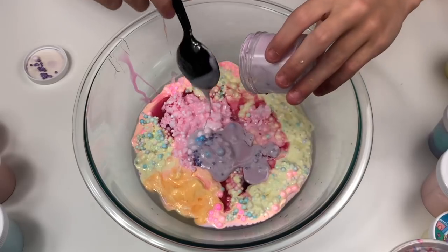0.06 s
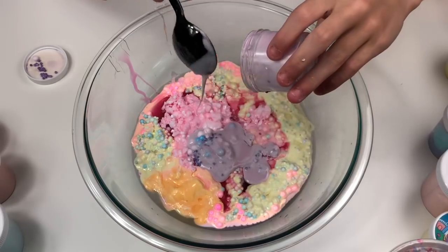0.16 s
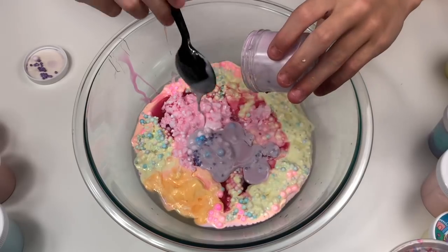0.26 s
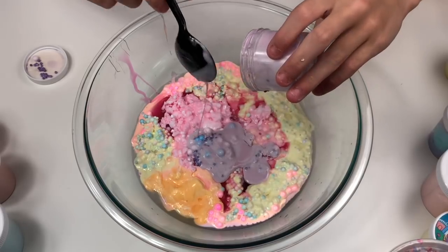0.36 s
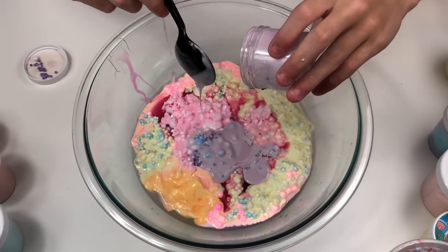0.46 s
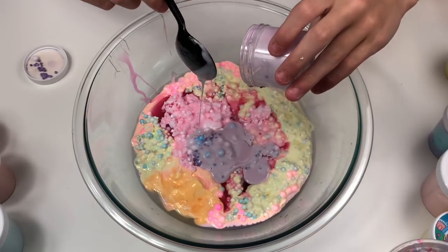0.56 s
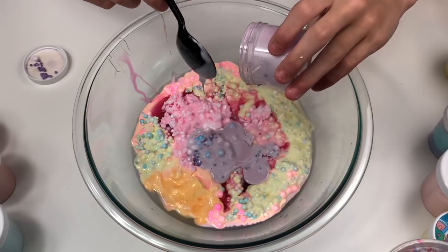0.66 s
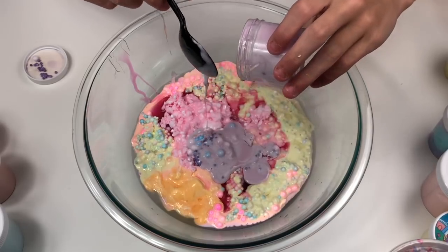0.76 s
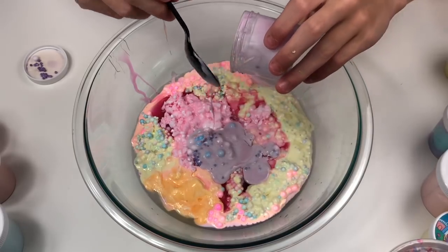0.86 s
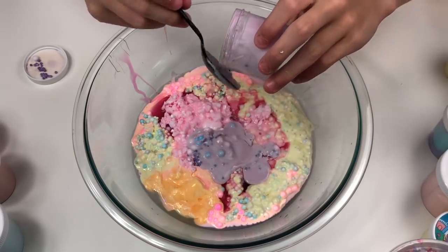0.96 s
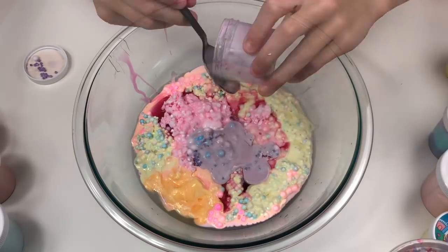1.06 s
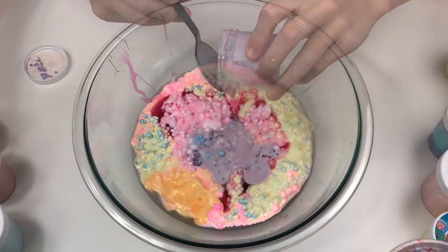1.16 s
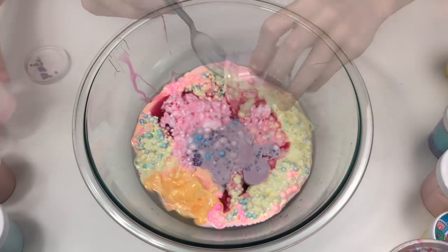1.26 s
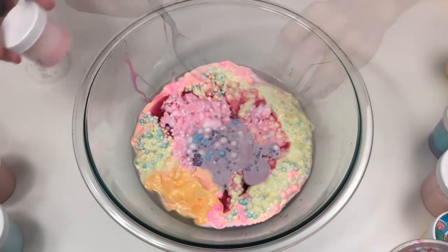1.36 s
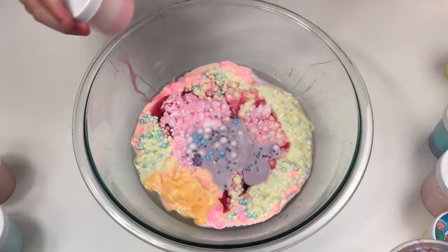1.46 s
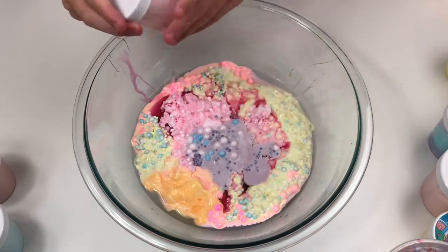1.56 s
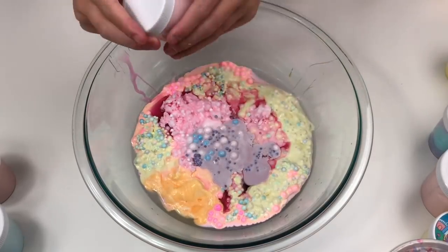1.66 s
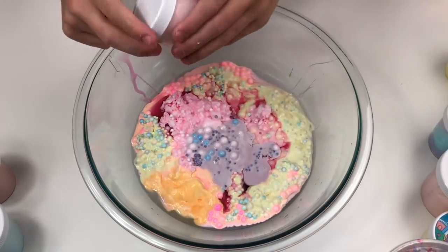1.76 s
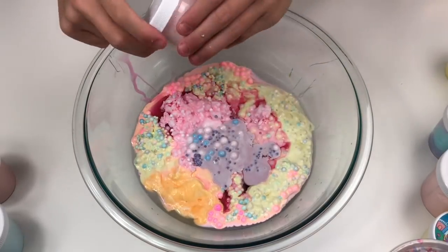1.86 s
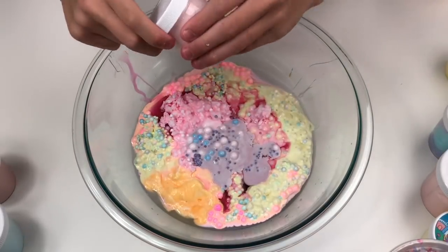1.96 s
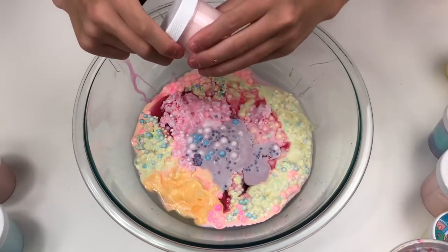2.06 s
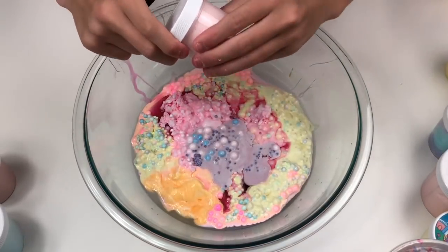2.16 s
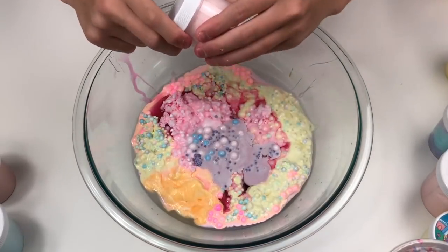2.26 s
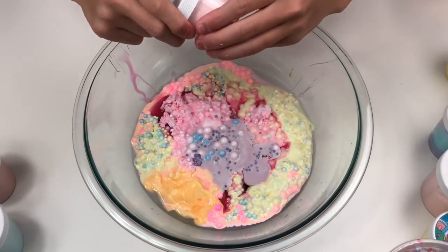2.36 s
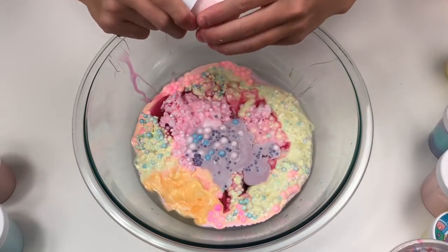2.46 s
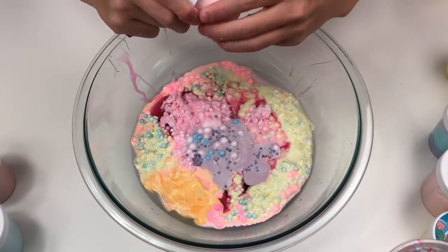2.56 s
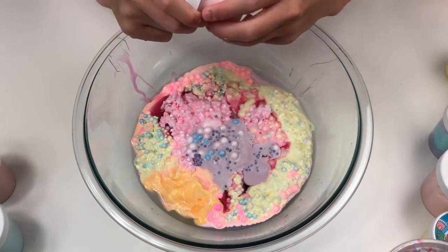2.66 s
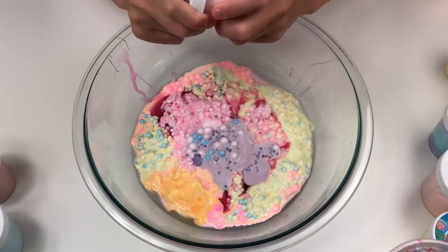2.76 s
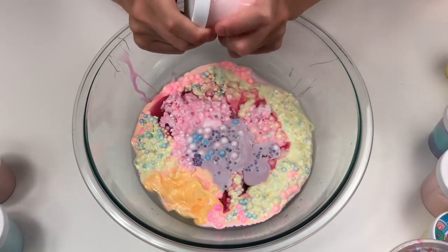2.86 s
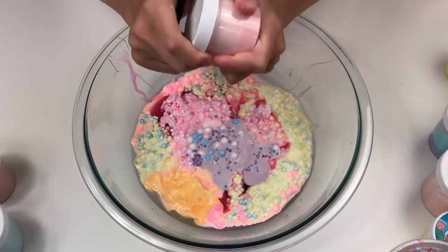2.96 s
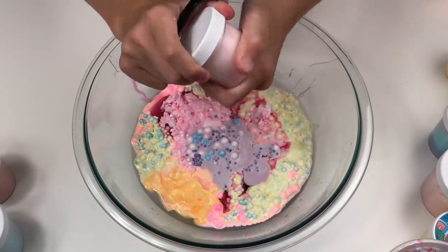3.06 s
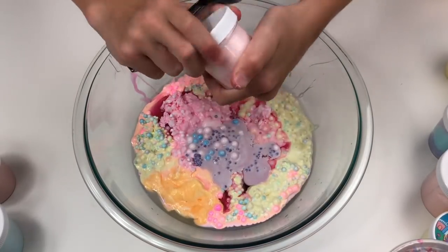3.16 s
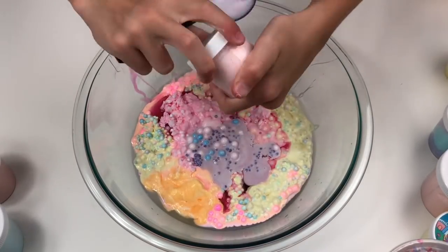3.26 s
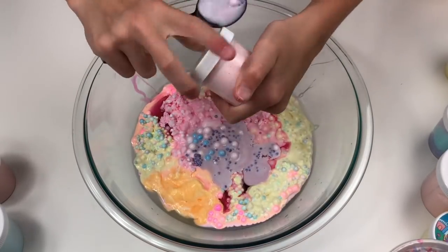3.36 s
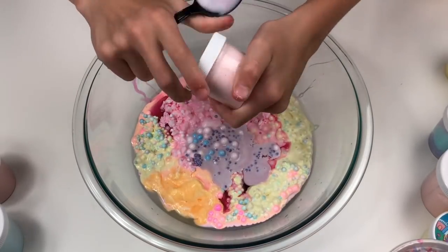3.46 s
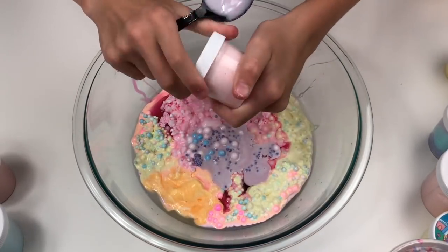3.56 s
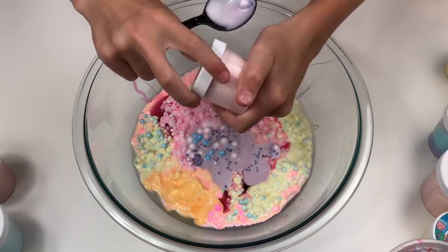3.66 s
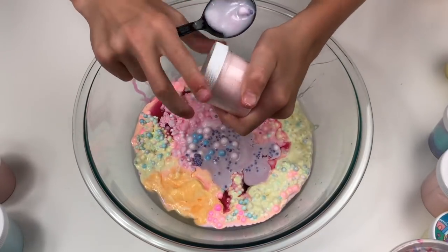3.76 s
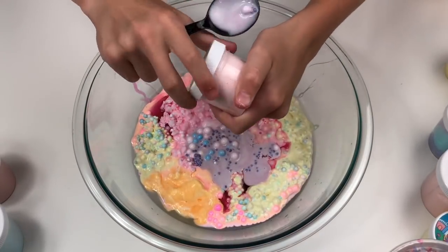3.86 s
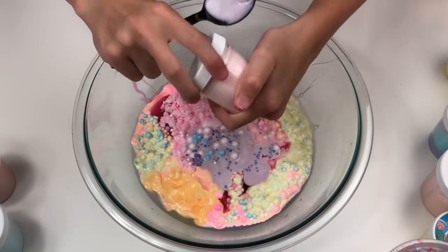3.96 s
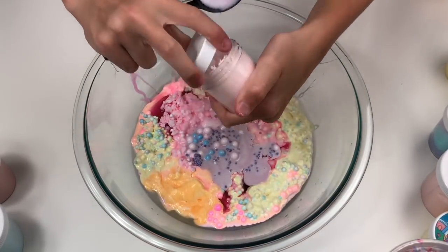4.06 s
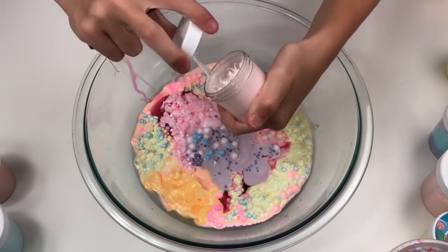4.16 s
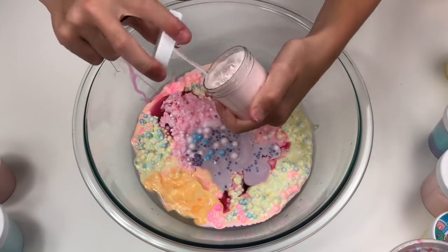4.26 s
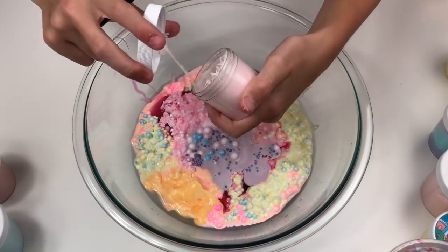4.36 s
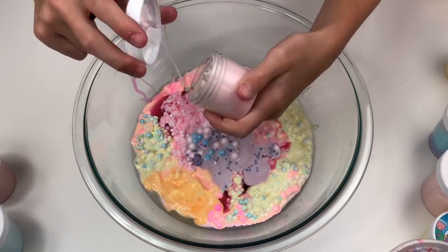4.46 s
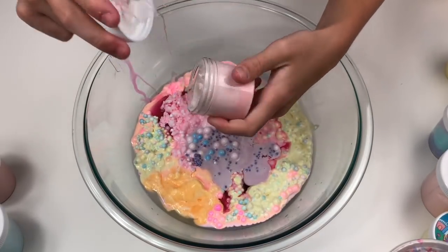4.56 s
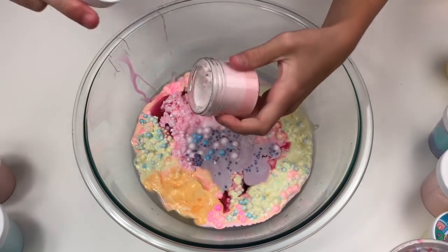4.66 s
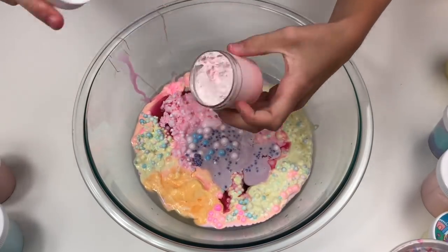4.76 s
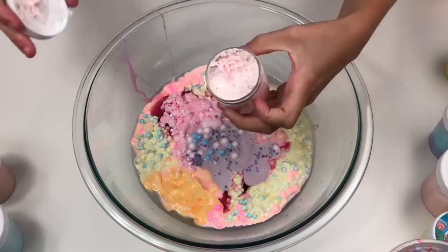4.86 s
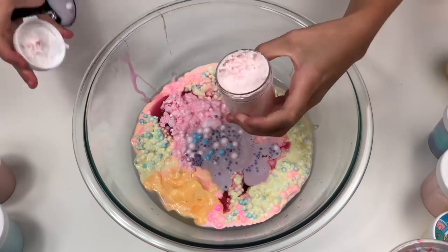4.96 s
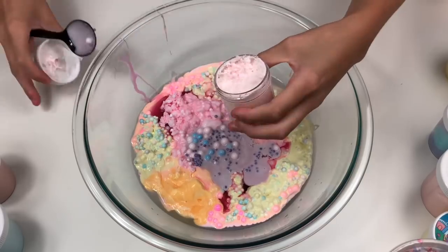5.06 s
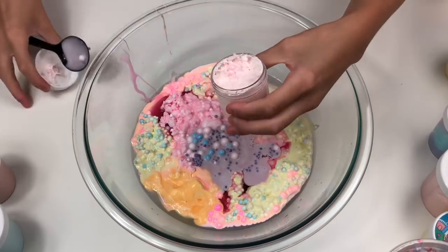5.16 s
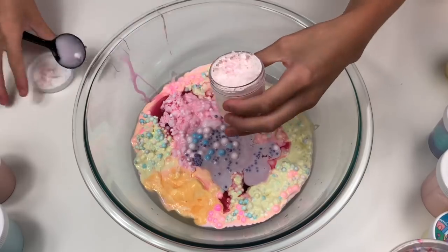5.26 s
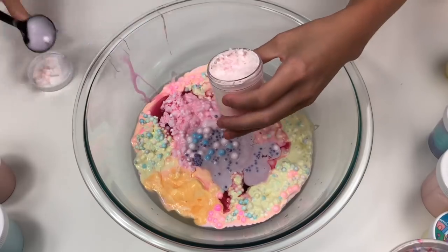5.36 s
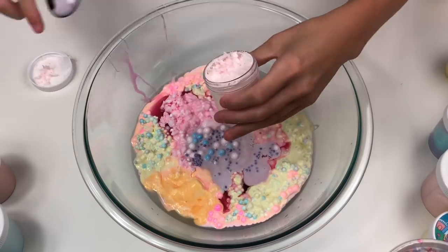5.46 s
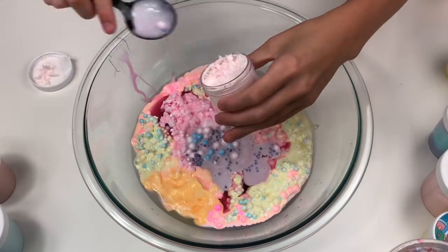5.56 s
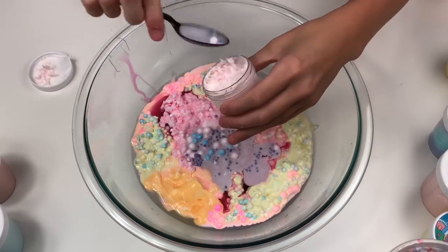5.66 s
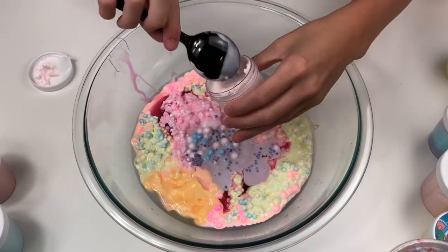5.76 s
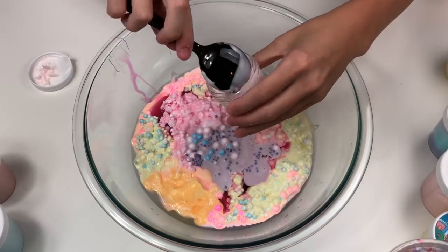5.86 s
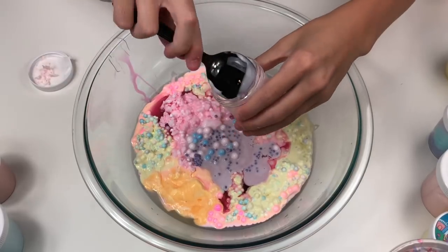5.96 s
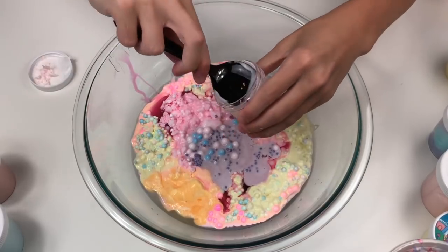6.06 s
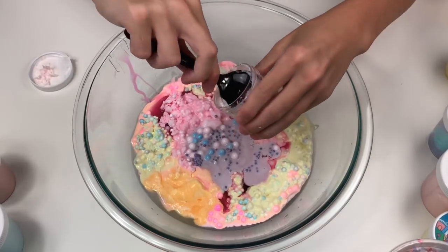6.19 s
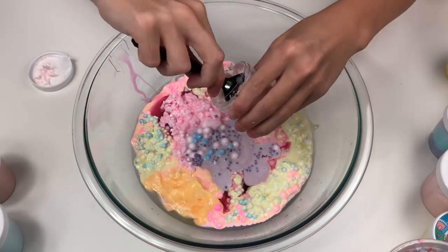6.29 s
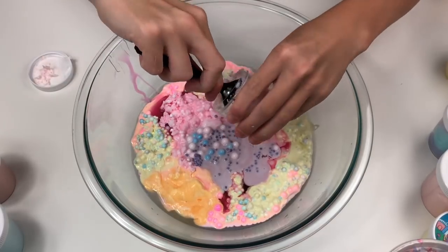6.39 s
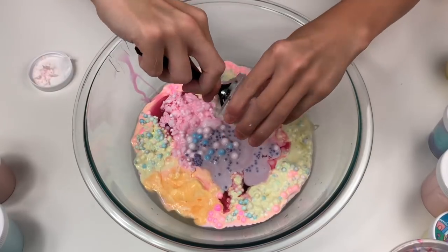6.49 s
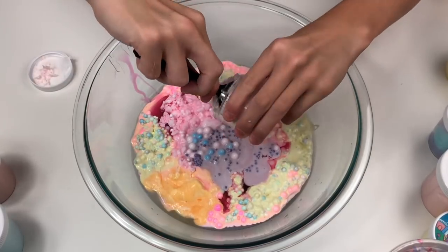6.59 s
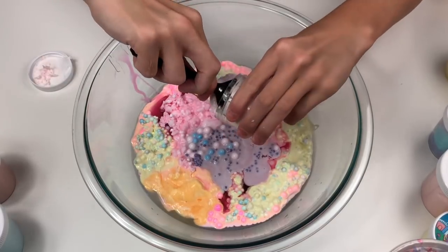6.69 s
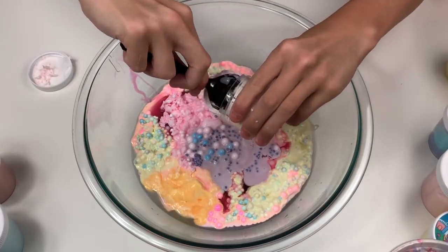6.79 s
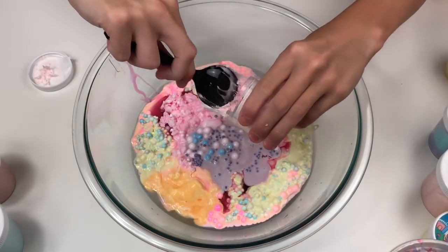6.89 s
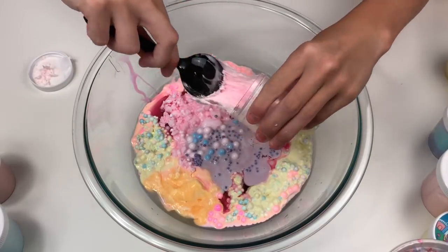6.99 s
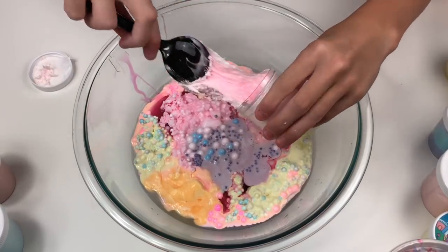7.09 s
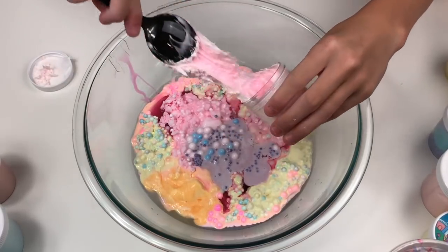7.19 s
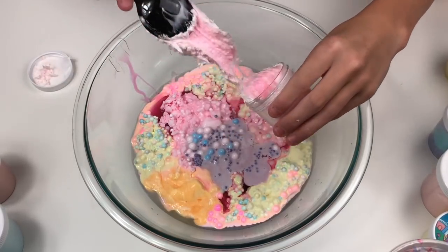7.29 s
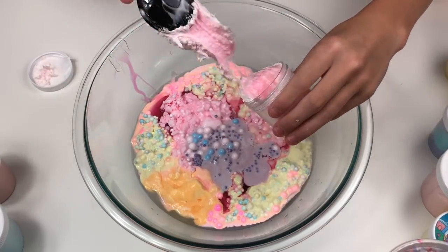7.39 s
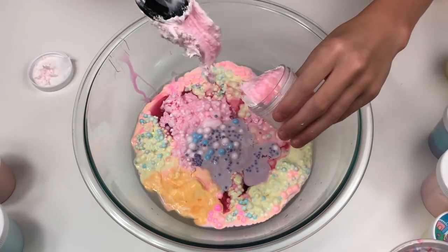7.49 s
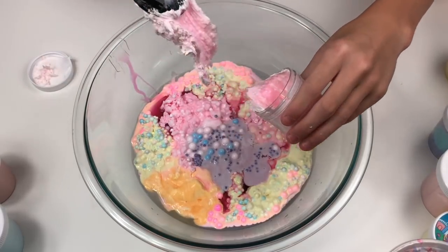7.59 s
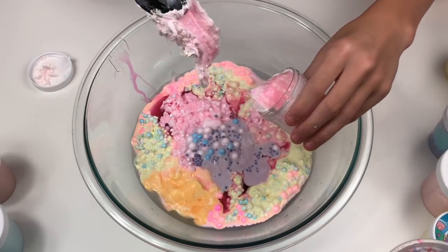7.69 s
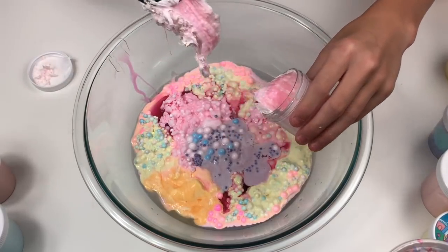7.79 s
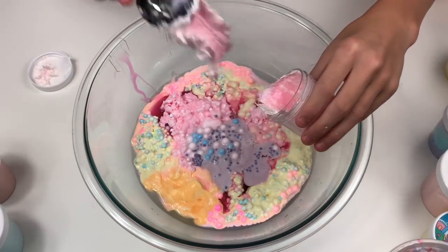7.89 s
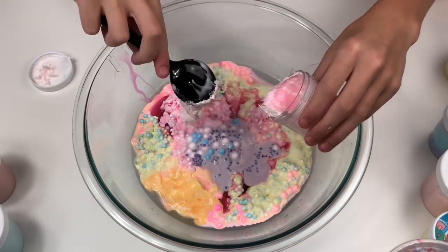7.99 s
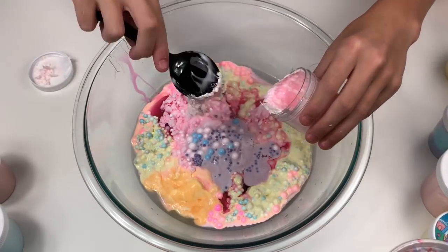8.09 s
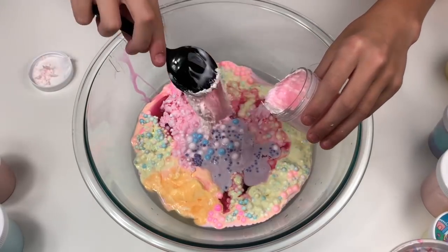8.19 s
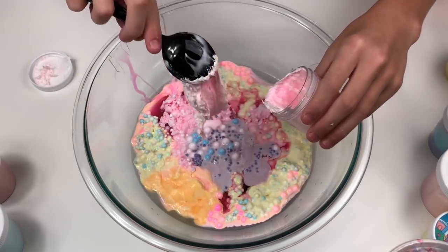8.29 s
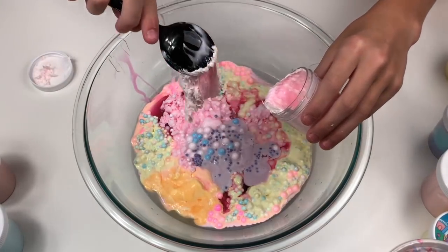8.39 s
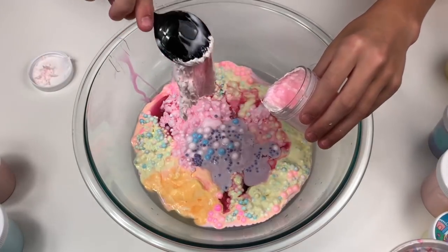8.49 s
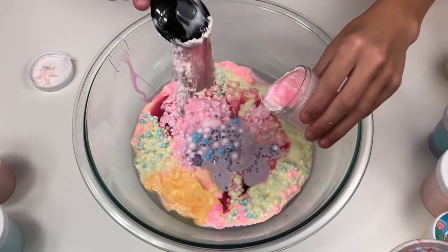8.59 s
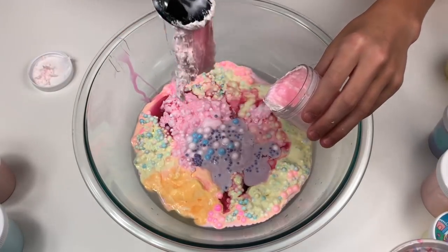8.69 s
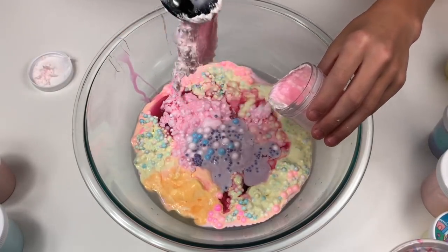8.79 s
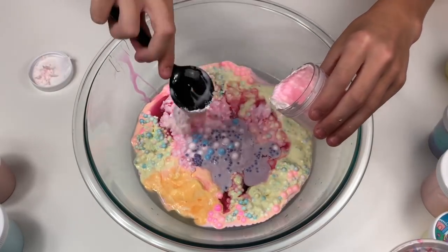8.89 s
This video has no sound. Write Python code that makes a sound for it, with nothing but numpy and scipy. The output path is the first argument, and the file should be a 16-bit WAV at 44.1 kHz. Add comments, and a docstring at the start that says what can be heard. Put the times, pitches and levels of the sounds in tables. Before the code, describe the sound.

Close plastic jar handling in a quiet room: sharp spoon tap, lid cracking and grinding open, lid dropped bouncing, then sticky slime crackling and popping.

```python
"""Quiet room, small plastic jars over a glass bowl on a table, heard close with the room well below.
A steady ventilation rumble, in wavering noise bands, lies under it all. First a spoon taps an empty jar, as noise
bursts that ring its modes; a seal cracks, then a lid grinds and knocks on its thread, drops and bounces.
From 6 s a spoon works sticky slime: pockets click, puff and crackle, and friction noise squeaks.
Slides and peels hiss in between, as swelling friction noise, and the last ones end the scene."""
import sys
import numpy as np
from scipy import signal
from scipy.io import wavfile

SR = 44100
rng = np.random.default_rng(int(sys.argv[2]) if len(sys.argv) > 2 else 0)


def transcribe(u):
    """Save the signal u as a 16-bit wav file named by the first command-line argument.

    u: samples, shape (n,) or (channels, n), limited to [-1, 1]; the rate is SR.
    q: integer samples, one column per channel.
    """
    v = np.clip(np.atleast_2d(u).T, -1, 1)
    q = np.round(v * 32767).astype(np.int16)
    wavfile.write(sys.argv[1], SR, q)


def magnitude_from_level(level_db):
    """Linear magnitude for a level in decibels (20 dB per decade)."""
    exponent = np.asarray(level_db, float) / 20
    return 10 ** exponent


N = 394254   # samples, 8.94 s
TOP_HZ = 16000   # cracks and pockets reach up to about here


def rms_one(x):
    """Scale to unit rms."""
    return x / np.sqrt(np.mean(x ** 2) + 1e-20)


def peak_one(x):
    """Scale to unit peak."""
    return x / (np.max(np.abs(x)) + 1e-20)


def at_hz(points, hz):
    """Read a table on a log-frequency axis."""
    table_hz, values = np.transpose(points)
    return np.interp(np.log(hz), np.log(table_hz), values)


def band(x, low, high):
    """Second-order band-pass."""
    return signal.sosfilt(signal.butter(2, [low, high], "band", fs=SR, output="sos"), x)


def high_pass(x, order, hz):
    """Take away the bass below hz."""
    return signal.sosfilt(signal.butter(order, hz, "high", fs=SR, output="sos"), x)


def drift(rate_hz):
    """Slow chance around zero, spread 1, computed at every 40th sample."""
    r = np.exp(-80 * np.pi * rate_hz / SR)
    chance = rng.standard_normal(N // 40 + 2002)
    slow = signal.lfilter([1], [1, -2 * r, r * r], chance)[2000:]   # skip the filter's start
    return np.interp(np.arange(N) / 40, np.arange(len(slow)), rms_one(slow))


def ring(force, hz, t60):
    """A damped resonance: a unit click sets a sine of height 1 ringing."""
    r, w = magnitude_from_level(-60 / (t60 * SR)), 2 * np.pi * hz / SR
    return signal.lfilter([0, np.sin(w)], [1, -2 * r * np.cos(w), r * r], force)


def swell(t, peak_s, rise_s, fall_s):
    """Gain that rises and falls evenly in dB around a peak."""
    return magnitude_from_level(20 * np.minimum((t - peak_s) / rise_s, (peak_s - t) / fall_s))


def add(out, start_s, sound):
    """Lay a sound into the track."""
    i = round(start_s * SR)
    out[i:i + len(sound)] += sound[:len(out) - i]


# Edges of the half-octave bands of the rumble and the room: edge_hz
HALF_OCTAVES = 25 * 2 ** np.arange(0, 9.6, .5)
# Colour of the rumble at the microphone, density against frequency: band_hz, level_db (per Hz, relative)
RUMBLE_COLOUR = [(15, -40), (25, -9.5), (59, -2.5), (130, -0.5), (394, -10.5), (591, -15), (1700, -21.5),
                 (2910, -26), (4030, -26), (14800, -33.5), (16000, -30)]


def rumble(waver_db, level_db):
    """Ventilation rumble and microphone hiss in half-octave noise bands that waver a little."""
    out, white = 0, rng.standard_normal((2, N))
    for k, (low, high) in enumerate(zip(HALF_OCTAVES, HALF_OCTAVES[1:])):
        gain = magnitude_from_level(at_hz(RUMBLE_COLOUR, np.sqrt(low * high)) + waver_db * drift(3.1))
        out = out + gain * band(white[k % 2], low, high)   # neighbours use separate noise
    out = high_pass(out, 4, 42)   # nothing deep reaches the microphone
    return magnitude_from_level(level_db) * rms_one(out)


# Time for the room to die by 60 dB: band_hz, t60_s
ROOM_DECAY = [(200, .4), (1500, 0.22), (5000, 0.12), (14000, 0.11)]


def room(x, gap_ms):
    """Diffuse echoes: noise that dies band by band, starting after the first wall."""
    t = np.arange(SR // 2) / SR
    echoes = 0
    for low, high in zip(HALF_OCTAVES[4:], HALF_OCTAVES[5:]):
        t60 = at_hz(ROOM_DECAY, np.sqrt(low * high))
        echoes = echoes + band(rng.standard_normal(len(t)), low, high) * magnitude_from_level(-60 * t / t60)
    echoes = echoes * np.clip(1000 * t / gap_ms - 1, 0, 1)   # silent for one gap, full after two
    return signal.fftconvolve(x, echoes / np.sqrt(np.sum(echoes ** 2)))[:N]


# Ringing of a full jar: mode_hz, level_db, t60_s
FULL_JAR_MODES = [(330, -2.5, 0.019), (611, 3.5, .028), (1150, -0.5, .015), (1427, 2.5, 0.019),
                  (1754, 2.5, .022), (3232, -7.5, .01), (4773, -7, 0.011)]


def friction(grain_db, grind_hz, focus_db):
    """Grainy friction noise, once in narrow bands for the hiss and once ringing the full jar as a grind."""
    centres = np.geomspace(1200, 14500, num=12)
    white = rng.standard_normal((3, N)) * magnitude_from_level(grain_db * drift(110))
    bands = [rms_one(band(white[k % 2], c / 1.12, c * 1.12)) for k, c in enumerate(centres)]
    grind = 0
    for mode_hz, level_db, t60 in FULL_JAR_MODES:
        strength_db = level_db - focus_db * abs(np.log2(mode_hz / grind_hz))   # focus in dB per octave
        grind = grind + magnitude_from_level(strength_db) * rms_one(ring(white[2], mode_hz, t60))
    return centres, np.array(bands), rms_one(grind)


def strokes(rows, noise, octaves):
    """Each stroke swells and fades, hissing around its colour and grinding in the jar."""
    out, (centres, bands, grind) = np.zeros(N), noise
    for peak_s, rise_s, fall_s, hiss_db, hiss_hz, grind_db in rows:
        # a fall of zero stops the stroke at its peak, a negative one before it
        i = np.arange(round((peak_s - 2 * rise_s) * SR), min(round((peak_s + 2 * fall_s) * SR), N))
        shares = np.exp(-.5 * (np.log2(centres / hiss_hz) / octaves) ** 2) * np.sqrt(centres)
        hiss = shares / np.sqrt(np.sum(shares ** 2)) @ bands[:, i]
        both = magnitude_from_level(hiss_db) * hiss + magnitude_from_level(grind_db) * grind[i]
        out[i] += swell(i / SR, peak_s, rise_s, fall_s) * both
    return out


# Fingers and spoon slide on plastic: peak_s, rise_s (by 20 dB), fall_s (by 20 dB), hiss_db, hiss_hz
SLIDE_STROKES = [(1.476, 0.02, 0.089, -66.5, 9000), (1.77, 0.38, 0.15, -70, 4300),
                 (1.89, 0.049, 0.23, -57.5, 3000), (2.37, 0.08, 0.093, -69.5, 5000),
                 (2.555, 0.04, 0.14, -69.5, 9000), (2.844, 0.25, 0.07, -71, 6400),
                 (4.11, 0.031, 0.2, -66.5, 5200), (4.3, 0.08, 0.091, -75.5, 8000),
                 (4.425, 0.029, 0.07, -68.5, 6000), (4.655, 0.02, 0.16, -68.5, 8500),
                 (4.945, 0.06, 0.07, -66, 11000), (5.6, 0.08, 0.11, -72, 8500),
                 (5.876, 0.19, 0.09, -75, 7200), (6.27, 0.06, 0.26, -63, 5400),
                 (6.702, 0.07, 0.035, -67.5, 11000), (6.78, 0.04, 0.03, -75, 7600),
                 (6.93, 0.06, 0.09, -64, 9600), (7.428, 0.045, 0.15, -68.5, 10000),
                 (7.692, 0.11, 0.08, -76, 6270), (8.656, 0.11, 0.07, -76, 6830)]


def slides(noise, grind_db):
    """Fingers and spoon slide with a broad hiss and ring the jar faintly, grind_db against the hiss."""
    return strokes([(*row, row[3] + grind_db) for row in SLIDE_STROKES], noise, octaves=1.22)


# Narrow hissing strokes, sticky slime peeling off and, at 1.2 and 1.26 s, the spoon rubbing the empty jar:
# peak_s, rise_s (by 20 dB), fall_s (by 20 dB), hiss_db, hiss_hz
PEEL_STROKES = [(1.2, 0.048, 0.07, -61, 1900), (1.26, 0.04, 0.04, -74, 1800),
                (2.57, 0.06, 0.072, -71.5, 7200), (4.648, 0.013, 0.087, -61, 7500),
                (5.575, 0.019, 0.15, -70, 9200), (6.695, 0.015, 0.08, -71, 4000),
                (7.43, 0.04, 0.05, -70.5, 2190), (8.388, 0.008, 0.078, -59.5, 7100)]


def peels(noise, grind_db):
    """Slime peels off, or the spoon rubs the empty jar, with a narrow hiss and rings the jar faintly, grind_db
    against the hiss."""
    return strokes([(*row, row[3] + grind_db) for row in PEEL_STROKES], noise, octaves=0.2)


# Lid thread and spoon grind on the jar: peak_s, rise_s (by 20 dB), fall_s (by 20 dB), hiss_db, grind_db
GRIND_STROKES = [(3.047, 0.01, 0.13, -56.5, -64.5), (3.168, 0.14, 0.045, -54, -66),
                 (3.276, 0.12, 0.18, -56.5, -57.5), (3.37, 0.2, -0.06, -68.5, -64),
                 (3.452, 0.1, 0, -74, -72), (3.625, 0.03, -0.03, -72, -59), (3.692, 0.05, 0.09, -54.5, -57),
                 (4.054, 0.0331, 0.045, -50, -53.5), (4.076, 0.06, 0.0345, -70, -53.5)]


def grinds(noise, hiss_hz):
    """Lid thread and spoon grind on the jar, which rings with the friction."""
    return strokes([(*row[:4], hiss_hz, row[4]) for row in GRIND_STROKES], noise, octaves=1.5)


def rubbing():
    """Slides, peels and grinds share one friction noise."""
    noise = friction(grain_db=2.5, grind_hz=1396, focus_db=6)
    return slides(noise, grind_db=-12.5) + peels(noise, grind_db=-12.5) + grinds(noise, hiss_hz=4300)


def blows(events, modes, focus_db, rattle_db, rattle_ms, octaves):
    """A brief rough contact cracks as a burst of noise, leaves a dense rattle and rings the modes."""
    spread_db = 1.5   # how far mode strengths vary from blow to blow
    wider_per_db, soft_blow_db = 0.02, -39.5   # harder blows crack over more octaves
    out, t = np.zeros(N), np.arange(SR // 5) / SR
    click = 1.0 * (t == 0)
    mode_hz, level_db, t60 = np.transpose(modes)
    signs = (-1) ** np.arange(len(modes))   # neighbours start opposed, so a close pair swells and beats
    rise = 1 - np.exp(-t / 0.00035)   # the force needs a moment to build
    for start_s, peak_db, crack_db, contact_ms, crack_hz in events:
        rough, chance = rng.standard_normal(len(t)), rng.standard_normal(len(modes))
        # focus weakens modes far from the crack's colour, in dB per octave; below zero it favours them
        strength_db = level_db + spread_db * chance - focus_db * np.abs(np.log2(mode_hz / crack_hz))
        gains = signs * magnitude_from_level(strength_db)
        body = sum(g * ring(click, hz, d) for g, hz, d in zip(gains, mode_hz, t60))
        contact = np.exp(-1000 * t / max(contact_ms, .1))
        rattle = magnitude_from_level(rattle_db) * np.exp(-1000 * t / rattle_ms)
        reach = 2 ** max(octaves + wider_per_db * (peak_db - soft_blow_db), 0.25)
        noise = rough * (contact + rattle) * rise
        crack = band(noise, crack_hz / reach, min(crack_hz * reach, TOP_HZ))
        blow = peak_one(body * rise) + magnitude_from_level(crack_db) * peak_one(crack)
        add(out, start_s, magnitude_from_level(peak_db) * peak_one(blow))
    return out


# The lid lands and bounces: start_s, peak_db, crack_db (against the ring), contact_ms, crack_hz
LID_BOUNCES = [(5.2365, -13.5, -0.2, 3.5, 1170), (5.3755, -16.5, 5, 3.3, 2920),
               (5.4285, -19.5, 10.5, 4, 2980)]
# Ringing of the lid: mode_hz, level_db, t60_s
LID_MODES = [(194, -13, .035), (330, -11, .025), (533, 1, .027), (856, -7, .018), (1340, -4, .018),
             (1620, -4, .015)]


def lid_drop():
    """The lid lands and bounces on the table, ringing its own low modes."""
    return blows(LID_BOUNCES, LID_MODES, focus_db=0.0, rattle_db=-21.5, rattle_ms=51.4, octaves=0.081)


# The lid's seal cracks: start_s, peak_db, crack_db (against the ring), contact_ms, crack_hz
SEAL_CRACKS = [(1.839, -31.5, 7.9, 13, 5000), (1.8735, -21, 3.7, 2.9, 3300), (1.908, -30.5, 7.5, 3.5, 6000),
               (2.063, -24.5, 17, 2.4, 9000)]
# Ringing of the seal: mode_hz, level_db, t60_s
SEAL_MODES = [(1220, -2.5, 0.018), (2160, 1.5, 0.016), (2650, 2, 0.023), (3800, 5, 0.01)]


def seal_cracks():
    """The seal of the lid cracks, mostly noise over a short ring."""
    return blows(SEAL_CRACKS, SEAL_MODES, focus_db=-1.0, rattle_db=-28.0, rattle_ms=43, octaves=1.42)


# The lid knocks on its thread: start_s, peak_db, crack_db (against the ring), contact_ms, crack_hz
THREAD_KNOCKS = [(2.699, -52.5, -4, 1.7, 1150), (3.324, -36, -5, 4.5, 1190), (3.369, -45.5, -7, 2.1, 1450),
                 (3.47, -40.5, -12, 1.9, 1780), (3.589, -34.5, -3, 3.7, 2150),
                 (3.598, -33.5, -20, 1.8, 1460), (3.6875, -41.5, -6, 2.1, 1500),
                 (3.943, -34.5, -9, 0.92, 1740), (3.987, -42, -2, 2.8, 616), (4.041, -35, -9, 2.2, 1440),
                 (4.049, -39, -14, 1.8, 1500), (4.066, -30, -17, 2.9, 1450), (4.078, -37, -12, 1.9, 1300),
                 (4.178, -53, 7, 1.8, 1440), (4.212, -52.5, 11, 3.2, 1490)]


def thread_knocks():
    """The lid knocks on its thread and rings the full jar."""
    return blows(THREAD_KNOCKS, FULL_JAR_MODES, focus_db=4.5, rattle_db=-19.0, rattle_ms=33, octaves=1.33)


# Spoon on the empty jar: start_s, peak_db, crack_db (against the ring), contact_ms, crack_hz
EMPTY_JAR_TAPS = [(1.083, -27.5, 4, 2.1, 5340), (1.188, -48.5, 23, 18.0, 470),
                  (1.298, -43, -14.5, 2.1, 1800), (1.3144, -9, -3.5, 2.8, 3904)]
# Ringing of the empty jar: mode_hz, level_db, t60_s
EMPTY_JAR_MODES = [(1275, 0, .034), (1400, -1, .034), (2660, -20, .045), (3750, -11, .018),
                   (7700, -22, .018)]


def empty_jar_taps():
    """The spoon taps the empty jar, whose closest pair of modes beats."""
    return blows(EMPTY_JAR_TAPS, EMPTY_JAR_MODES, focus_db=0.5, rattle_db=-28, rattle_ms=14, octaves=0.5)


# Spoon on the rim of the full jar: start_s, peak_db, crack_db (against the ring), contact_ms, crack_hz
RIM_TAPS = [(6.546, -32, -3.5, 3.9, 1900)]


def rim_taps():
    """The spoon touches the rim of the full jar and rings it."""
    return blows(RIM_TAPS, FULL_JAR_MODES, focus_db=7.5, rattle_db=-27, rattle_ms=25, octaves=0.64)


def squeak():
    """The spoon squeaks through the slime: wet friction noise through two narrow resonances."""
    white = rng.standard_normal(N) * magnitude_from_level(3.1 * drift(60.0))
    rings = rms_one(ring(white, 3000, t60=0.014)) + rms_one(ring(white, 3650, t60=0.016))
    gain = swell(np.arange(N) / SR, peak_s=6.5, rise_s=0.07, fall_s=0.19)
    return magnitude_from_level(-69) * gain * rings


# The spoon works the slime, read as a curve: start_s, level_db, pitch_hz (of the small pockets)
SLIME_PULL = [(5.97, -77.5, 8000), (6.05, -74, 8000), (6.065, -59, 8500), (6.1, -76, 8500),
              (6.19, -74.5, 9000), (6.25, -64, 4540), (6.33, -74, 3800), (6.41, -79, 3800),
              (6.55, -73, 11000), (6.85, -78, 12500), (6.95, -77, 9900), (7.2, -73.5, 8500),
              (7.3, -95, 9000)]


def crackle(size_db, octaves, pockets_per_s):
    """Tiny pockets burst at random as the slime is pulled, each ringing a few cycles near the centre pitch."""
    start_s, level_db, pitch_hz = np.transpose(SLIME_PULL)
    i = np.arange(round(start_s[0] * SR), round(start_s[-1] * SR))
    born = rng.random(len(i)) < pockets_per_s / SR
    sizes = magnitude_from_level(size_db * np.minimum(rng.exponential(1, len(i)), 3)) * rng.choice([-1, 1], len(i))
    wanted = np.interp(i / SR, start_s, pitch_hz) * 2 ** (octaves * rng.standard_normal(len(i)))
    pitches = np.geomspace(2900, 15000, num=10)
    nearest = np.argmin(np.abs(np.log(wanted / pitches[:, None])), axis=0)
    rings = 0
    for k, hz in enumerate(pitches):
        bursts = sizes * born * (nearest == k) + 1e-18
        rings = rings + ring(bursts, hz, t60=4.5 / hz)
    out = np.zeros(N)
    out[i] = rms_one(band(rings, 2700, TOP_HZ)) * magnitude_from_level(np.interp(i / SR, start_s, level_db))
    return out


# Sharp clicks with a puff of noise, mostly larger air pockets in the slime bursting, and at 3.27 s a bright
# tick of the lid on its thread: start_s, peak_db, pitch_hz (centre of the puff)
CLICK_PUFFS = [(0.7954, -42.5, 4200), (2.378, -50, 4900), (2.5401, -51, 7000), (2.5595, -47.5, 7580),
               (2.6285, -46, 15000), (2.7003, -41.5, 10000), (2.79, -53, 7000), (2.9557, -54, 12000),
               (2.9728, -55, 7900), (3.27, -45, 4600), (3.765, -53, 5300), (3.787, -56, 14000),
               (4.17, -52, 9500), (4.235, -53, 11000), (4.765, -54, 12960), (5.955, -54, 10000),
               (5.9959, -37, 3310), (6.0176, -47, 3570), (6.0577, -26, 7000), (6.0978, -25.5, 9050),
               (6.108, -55, 2600), (6.14, -55, 6000), (6.155, -30, 13100), (6.21, -34, 12500),
               (6.2177, -44, 4820), (6.2466, -36, 3660), (6.2622, -32, 14700), (6.2945, -36, 12000),
               (6.346, -46.5, 9000), (6.4233, -40, 14040), (6.4703, -51, 9800), (6.523, -44, 7100),
               (6.5436, -38, 11900), (6.5664, -40, 7540), (6.5794, -37, 14200), (6.5954, -49, 9040),
               (6.6197, -44.5, 14800), (6.636, -52, 13000), (6.6594, -50, 14500), (6.6975, -46, 14330),
               (6.726, -50, 13500), (6.757, -55, 11000), (6.775, -54, 10000), (6.805, -41, 13700),
               (6.8193, -50, 8500), (6.828, -50, 15000), (6.848, -53, 15000), (6.8676, -50, 13870),
               (6.898, -44.5, 14400), (6.9413, -49, 14400), (7.0065, -49.5, 14600), (7.028, -40, 14200),
               (7.0474, -45, 6760), (7.076, -52, 7500), (7.0837, -50.5, 5500), (7.111, -55, 12000),
               (7.1417, -47, 12900), (7.21, -49, 6500), (8.0506, -55, 5460), (8.093, -46.5, 12400),
               (8.3878, -50, 6200)]


def pops(reach):
    """Each air pocket, or the lid's bright tick, bursts with a sharp click and a puff of noise, coloured
    broadly by its size."""
    puff_s, puff_cycles = 0.013, 40   # a puff lasts this time plus so many cycles of its pitch
    click_db, click_per_db, soft_pop_db = 12.0, 0.35, -51   # louder ones click more
    out, t = np.zeros(N), np.arange(SR // 12) / SR
    for start_s, peak_db, pitch_hz in CLICK_PUFFS:
        t60 = puff_s + puff_cycles / pitch_hz
        puff = rng.standard_normal(len(t)) * magnitude_from_level(-60 * t / t60)
        puff[0] += magnitude_from_level(click_db + click_per_db * (peak_db - soft_pop_db))
        low, high = max(pitch_hz / reach, 2400), min(pitch_hz * reach, TOP_HZ + 900)
        add(out, start_s, magnitude_from_level(peak_db) * peak_one(band(puff, low, high)))
    return out


def scene():
    """Everything at the table sounds directly and through the room, above the rumble."""
    hits = lid_drop() + seal_cracks() + thread_knocks() + empty_jar_taps() + rim_taps()
    hits = high_pass(hits, 2, 150)   # the hits carry no deep bass
    slime = squeak() + crackle(size_db=3.0, octaves=0.52, pockets_per_s=520) + pops(reach=2.27)
    table = rubbing() + hits + slime
    echoes = magnitude_from_level(-16) * room(table, gap_ms=4.5)
    return (table + echoes + rumble(waver_db=0.37, level_db=-67))[None]


def top_cut(x):
    """Nothing passes above the cut-off."""
    return signal.sosfilt(signal.butter(12, 17010, fs=SR, output="sos"), x)


def record(dry):
    """A steep low-pass takes away the top of the mix, 60 dB down from 16.7 kHz."""
    mix = signal.sosfilt(signal.cheby2(12, 60, TOP_HZ + 700, fs=SR, output="sos"), dry)
    return top_cut(mix)


dry = scene()
out = record(dry)
transcribe(out)
```